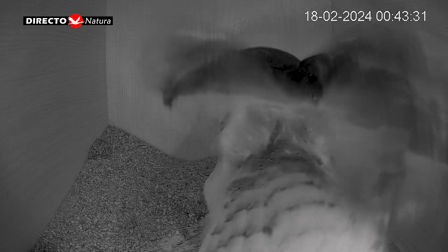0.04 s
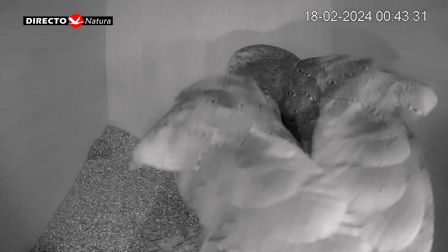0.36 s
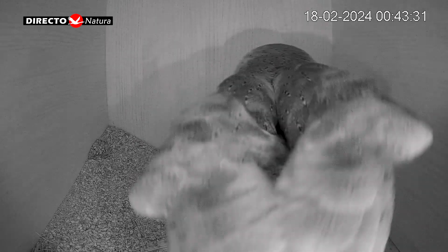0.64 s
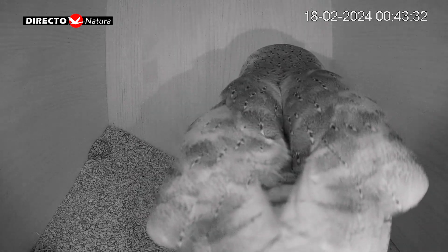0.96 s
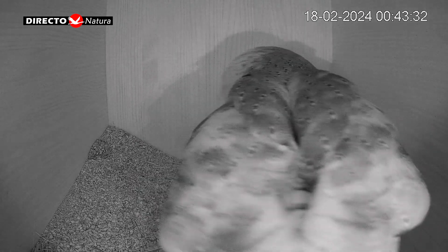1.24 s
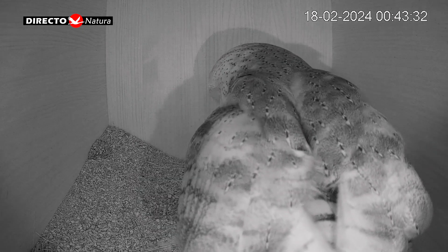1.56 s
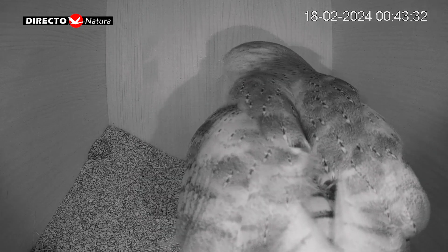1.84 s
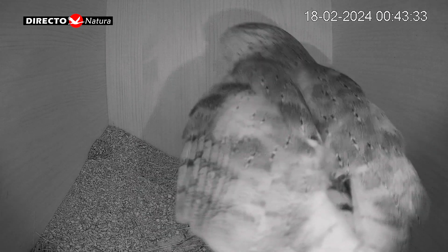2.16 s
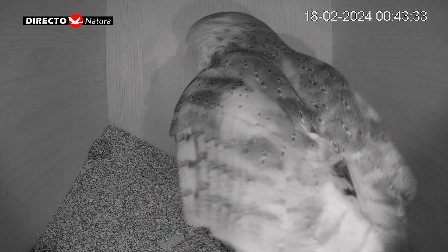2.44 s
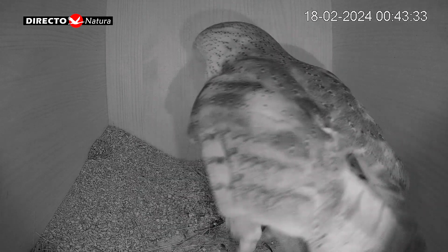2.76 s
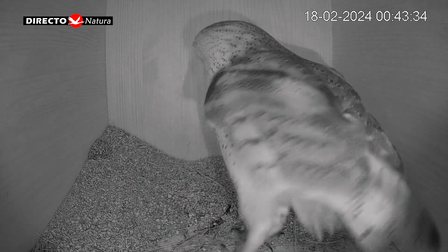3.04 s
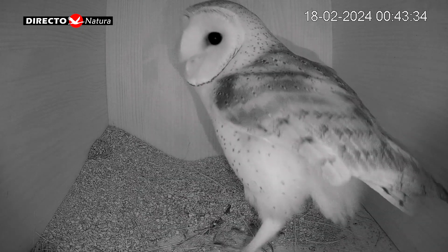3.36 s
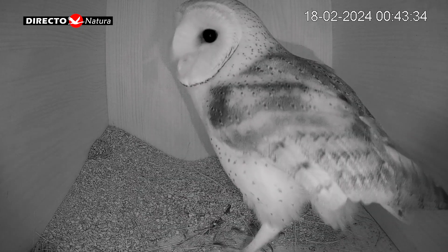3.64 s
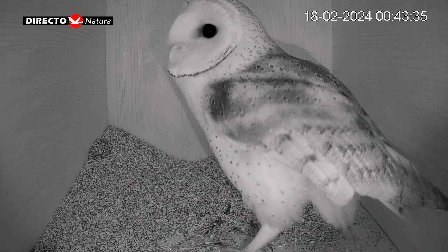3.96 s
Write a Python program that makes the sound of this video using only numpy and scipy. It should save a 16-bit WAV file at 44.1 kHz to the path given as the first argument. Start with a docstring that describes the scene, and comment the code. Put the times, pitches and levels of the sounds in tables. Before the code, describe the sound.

An owl's wingbeat hits a close microphone right at the start with a pop and a low, muffled gust, fading by 0.5 seconds. A faint hum fills the wooden nest box, with slight bumps around 1.5 seconds. Near 2.8 seconds come a quick claw scrape, a short low judder and a soft thump. Fainter bumps and scratches follow until about 4 seconds, over a barely audible hollow tone.

```python
"""A pop and a low, buffeting gust: a small microphone switches on in mid wingbeat as a barn owl lands
beside it in a wooden nest box. Later the bird turns round: its weight bumps the floor, its feet
stick and slip in a judder on the boards, and its claws scrape the litter and ring the box.
Under it all lie faint air noise, a low hum and a wavering hollow tone."""
import sys
import numpy as np
from scipy import signal
from scipy.fft import rfft, irfft
from scipy.io import wavfile

SR = 44100
rng = np.random.default_rng(int(sys.argv[2]) if len(sys.argv) > 2 else 0)


def wav_record(signal):
    """Record a signal, one row per channel, as 16-bit PCM in the file named by sys.argv[1]."""
    frames = np.transpose(np.atleast_2d(signal))
    bounded = np.clip(frames, -1, 1)
    # unit amplitude maps onto the largest positive 16-bit level
    quanta = np.round(bounded * 32767).astype(np.int16)
    wavfile.write(sys.argv[1], SR, quanta)


N = 176400


def undb(db):
    """Decibels to gain."""
    return 10 ** (np.asarray(db) / 20)


def unit(x):
    """Scale to rms 1."""
    return x / np.sqrt(np.mean(x ** 2))


def since(start):
    """Seconds since a moment, for every sample."""
    return np.arange(N) / SR - start


def freqs():
    """Frequency of each spectrum bin, at least 1 Hz."""
    return np.maximum(np.arange(N // 2 + 1) * SR / N, 1)


def noise(gain):
    """Noise of rms 1, shaped by a gain per bin."""
    return unit(irfft(rfft(rng.standard_normal(N)) * gain, N))


def colour(points):
    """Gain per bin from an EQ curve of (frequency [Hz], level [dB]) points."""
    hz, db = np.array(points).T
    return undb(np.interp(np.log(freqs()), np.log(hz), db))


def resonance(hz, width_hz):
    """Response of one resonance, 1 at its centre."""
    f = freqs()
    return 1 / (1 + 1j * (f * f - hz * hz) / (f * width_hz))


def ring(start, hz, t60):
    """A sine that dies away by 60 dB in t60 seconds."""
    t = np.maximum(since(start), 0)
    return np.sin(2 * np.pi * hz * t) * np.exp(-np.log(1000) * t / t60)


def room_tone():
    """The bed: faint air in the box, a wavering low hum and a hollow tone that comes and goes."""
    # narrow noise bands of the hum: (frequency [Hz], width [Hz], level [dB])
    hum_bands = [(68.5, 11, -62), (569, 11, -99.5), (663, 11, -91.5), (762.2, 25, -93.5)]
    # fader moves of the hollow tone: (time [s], level [dB])
    hollow_fader = [(0, -97.5), (2.6, -93.5), (2.751, -84.5), (3.05, -78.5), (3.2, -78.5), (3.349, -90.5),
                    (3.45, -72), (3.539, -87), (3.68, -75.5), (3.77, -71.5), (3.84, -90), (3.919, -77),
                    (4, -93)]
    # EQ of the air: (frequency [Hz], relative level [dB])
    air_eq = [(10, -7.5), (20, -7.5), (37, -8), (60, -9), (85, -14.5), (104, -25.5), (135, -32),
              (168, -28.5), (215, -43.5), (285, -33.5), (347, -34.5), (405, -48.5), (470, -36), (515, -45),
              (680, -39.5), (880, -41), (1220, -45.5), (1600, -51), (3440, -54.5)]
    hum = sum(undb(db) * noise(resonance(hz, width) ** 2) for hz, width, db in hum_bands)
    swell = undb(np.interp(since(0), *np.array(hollow_fader).T))
    hollow = swell * noise(resonance(hz=682.4, width_hz=50) ** 2)
    air = undb(-65.5) * noise(colour(air_eq))
    return air + hum + hollow


def floor_bumps():
    """Soft shifts of the bird's weight ring the low modes of the floor."""
    # shifts of weight: (time [s], gain [dB])
    pushes = [(1.395, -49.5), (1.484, -51.5), (2.904, -41), (2.976, -48), (3.165, -52), (3.449, -51),
              (3.616, -47.5), (3.922, -50.5)]
    # floor modes: (frequency [Hz], gain [dB], 60 dB decay time [s])
    floor_modes = [(68.7, 2.5, 0.23), (154, -13, 0.16), (285, -22, 0.19), (350, -25.5, 0.13)]
    attack_s = 0.0094
    out = np.zeros(N)
    for start, db in pushes:
        attack = 1 - np.exp(-np.maximum(since(start), 0) / attack_s)
        thud = sum(undb(mode_db) * ring(start, hz, t60) for hz, mode_db, t60 in floor_modes)
        out += undb(db) * attack * thud
    return out


def claw_scrapes():
    """Claws and feathers drag through the litter: dense runs of tiny slips that ring the box."""
    # scrapes: (time [s], length [s], level [dB], brightness [dB per octave])
    strokes = [(0.113, 0.046, -76.5, 1), (0.162, 0.041, -78.5, -4), (0.462, 0.018, -79, -3),
               (1.971, 0.051, -75.5, -12.5), (2.663, 0.015, -73.5, -0.5), (2.807, 0.017, -66.5, 0),
               (2.831, 0.0094, -42, -3), (2.843, 0.012, -40, -3), (3.253, 0.037, -69, 3),
               (3.265, 0.004, -53.5, 12), (3.295, .03, -69.5, -10), (3.324, .013, -64, 0),
               (3.441, 0.026, -76, -17.5), (3.589, 0.011, -60.5, -6), (3.598, 0.0097, -51, -11.5),
               (3.612, 0.012, -65, -2)]
    # resonances of the wooden box: (frequency [Hz], width [Hz], gain [dB])
    box_modes = [(475.6, 19, -3.5), (563, 32, 1.5), (692, 31.6, 0), (867, 24, 6), (1120, 54, -3.5),
                 (1203, 35, -7), (1256, 25, -5), (1521, 44, -5.5), (1870, 55, -1.5), (2108, 36, -12.5),
                 (2290, 140, -15), (2710, 85, -10.5), (3070, 68.3, -14), (3310, 110, -18.5)]
    slips_per_s, spread_db, release_s = 2300, 2, 0.0053
    box = sum(undb(db) * resonance(hz, width) for hz, width, db in box_modes)
    direct = undb(-19) * resonance(hz=950, width_hz=5000)  # rasp straight from the litter
    octaves = np.log2(np.clip(freqs(), 400, 3593) / 1000)  # the tilt pivots on 1 kHz
    out = np.zeros(N)
    for start, length, db, brightness in strokes:
        t = since(start)
        slips = (rng.random(N) < slips_per_s / SR) * rng.choice([-1, 1], N)
        strength = undb(spread_db * np.minimum(rng.exponential(size=N), 4))
        envelope = (t > 0) * np.exp(-np.maximum(t - length, 0) / release_s)
        tilt = undb(brightness * octaves)
        rasp = irfft(rfft(slips * strength * envelope) * (box + direct) * tilt, N)
        stroke_rms = np.sqrt(np.sum(rasp ** 2) / (length * SR) + 1e-18)
        out += undb(db) * rasp / stroke_rms
    return out


def board_judders():
    """A wing or foot sticks and slips on a board: a short, uneven low note with weak overtones."""
    # stick-slip runs: (time [s], length [s], slip rate [Hz], level [dB])
    runs = [(.052, 0.051, 116, -22.5), (2.859, 0.076, 74.8, -36.5)]
    rolloff_db_per_octave, rate_jitter, fade_share = -14, 0.046, .3
    out = np.zeros(N)
    for start, length, rate, db in runs:
        t = since(start)
        wobble = noise(1 / (1 + (freqs() / 60) ** 4))
        slip_hz = rate * (1 + rate_jitter * wobble)
        phase = 2 * np.pi * np.cumsum(slip_hz * (t > 0)) / SR
        note = sum(undb(rolloff_db_per_octave * np.log2(k)) * np.sin(k * phase) for k in range(1, 5))
        fade = np.clip(np.minimum(t, length - t) / (fade_share * length), 0, 1)
        out += undb(db) * np.sqrt(2) * note * np.sin(np.pi / 2 * fade) ** 2
    return out


def wingbeat():
    """The wings set the air rocking in the box, and their draught buffets the microphone."""
    # draughts: (time [s], hold [s], level [dB], 60 dB decay time [s])
    draughts = [(0.048, 0.051, -18, 0.29), (0.324, .03, -51, 0.22)]
    # EQ of the turbulence on the microphone: (frequency [Hz], relative level [dB])
    turbulence_eq = [(10, -0.5), (30, 7.5), (60, -6.5), (120, -10), (180, -21), (300, -34.5), (400, -44.5),
                     (500, -49.5), (650, -53), (1000, -69.5), (2000, -89.5)]
    attack_s = .008
    out = -undb(-10) * ring(start=.073, hz=12, t60=0.37)  # subsonic rocking of the air
    for start, hold, db, t60 in draughts:
        t = since(start)
        attack = np.clip(t / attack_s, 0, 1)
        decay = np.exp(-np.log(1000) * np.maximum(t - hold, 0) / t60)
        gust = noise(colour(turbulence_eq)) * attack * decay
        body = gust[(t > 0) & (t < 2 * hold)]
        out += undb(db) * gust / np.sqrt(np.mean(body ** 2))
    return out


def scene():
    """The owl's movements over the room tone, in mono."""
    return (wingbeat() + board_judders() + floor_bumps() + claw_scrapes() + room_tone())[None]


def record(dry):
    """A narrow-band microphone switches on with a pop, over a trace of electronic hiss."""
    switch_on_s, fade_in_s, pop_decay_s = .0576, .004, 0.0098
    mic_top_hz, output_top_hz = 3593, 16700
    mic_lowpass = signal.ellip(8, .3, 60, mic_top_hz, fs=SR, output="sos")
    output_lowpass = signal.ellip(10, .2, 80, output_top_hz, fs=SR, output="sos")
    t = since(switch_on_s)
    muffled = signal.sosfilt(mic_lowpass, dry) * np.clip(t / fade_in_s, 0, 1)
    pop = undb(-18.5) * np.exp(-np.maximum(t, 0) / pop_decay_s)
    hiss = undb(-101) * rng.standard_normal(N)
    return signal.sosfilt(output_lowpass, (muffled + pop + hiss) * (t > 0))


dry = scene()
out = record(dry)
wav_record(out)
```